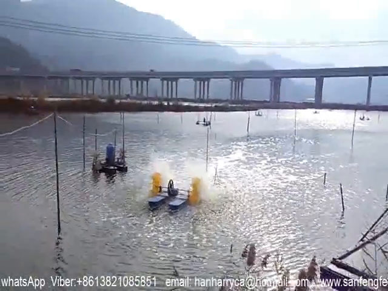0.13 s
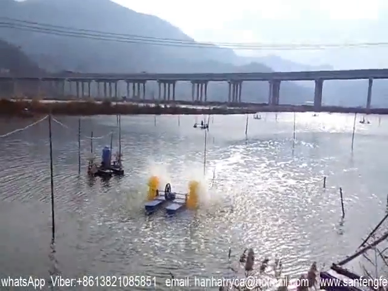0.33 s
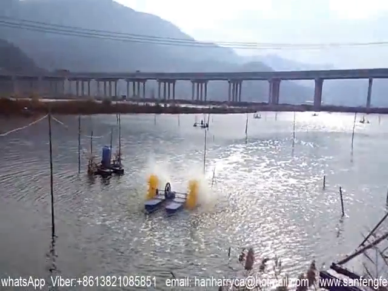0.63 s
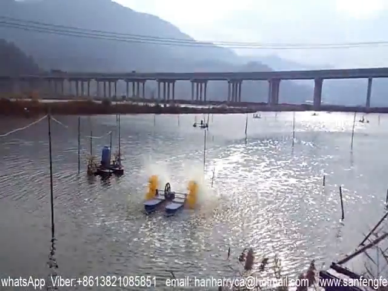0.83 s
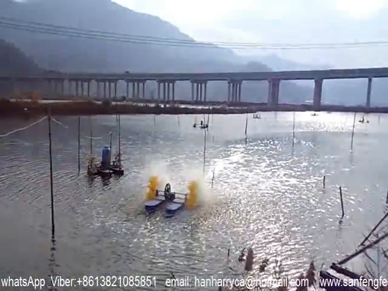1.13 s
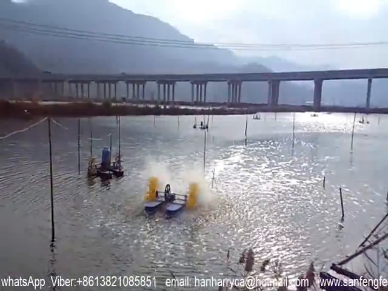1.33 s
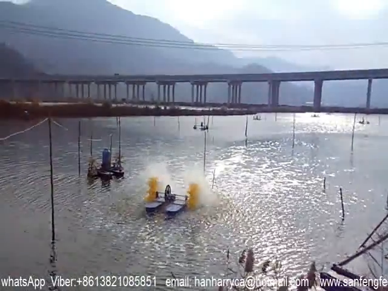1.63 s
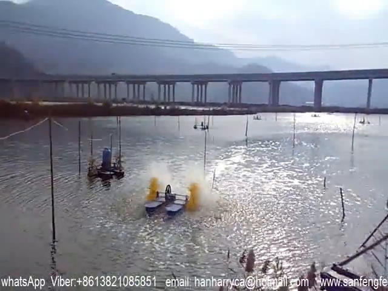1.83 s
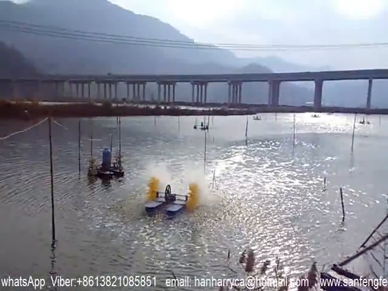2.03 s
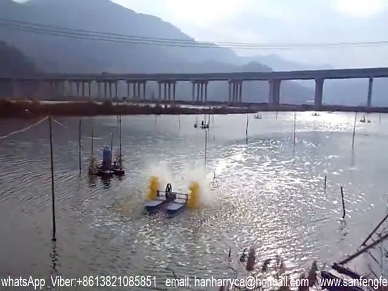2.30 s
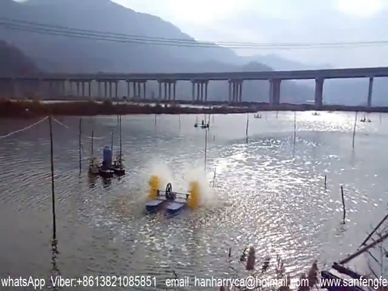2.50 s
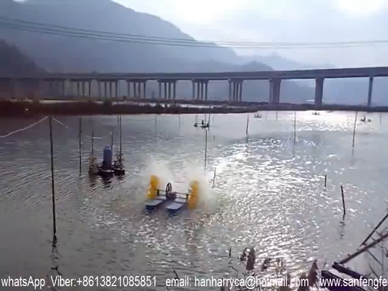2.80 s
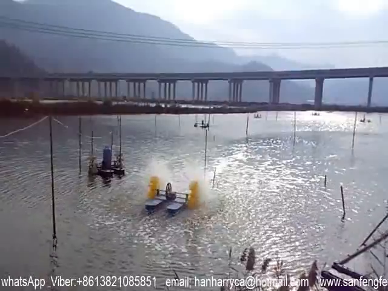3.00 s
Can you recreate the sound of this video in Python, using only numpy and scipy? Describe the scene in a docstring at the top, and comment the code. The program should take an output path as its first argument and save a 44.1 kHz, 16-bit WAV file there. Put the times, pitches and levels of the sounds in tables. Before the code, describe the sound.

A paddlewheel aerator churns a pond at some distance throughout: dense, bright spray and pattering drops over a low, slightly fluttering motor hum, pulsing faintly with the quick blades. Soft scrapes recur; short mid-pitched gear moans join from 0.6 s. Small water splats land at 1.1-1.9 s. Low wind bursts buffet the microphone, mostly right, strongest at 2.2-2.8 s; the machine dips, faintest near 2.95 s, then partly recovers.

```python
"""A paddlewheel aerator churns a pond some way off: throughout, motor harmonics hum, frame resonances
ring, and noise bands and ringing clicks make the wash and drops. Narrow noise chirps scrape and bass-noise
gusts buffet the microphone, mostly on the right, from the start. Sine moans of the gears join at 0.6 s,
in groups about once a turn; noise-burst splats land from 1.1 to 1.9 s. The strongest gusts come at
2.2-2.8 s; during them the aerator grows fainter, lowest at 2.95 s, then partly recovers."""
import sys
import numpy as np
from scipy import signal
from scipy.fft import rfft, irfft, next_fast_len
from scipy.io import wavfile

SR = 44100
rng = np.random.default_rng(int(sys.argv[2]) if len(sys.argv) > 2 else 0)


def store_wav(level_fs):
    """Save 16-bit WAV to argv[1]."""
    pcm = np.round(np.clip(np.atleast_2d(level_fs), -1, 1) * 32767)
    wavfile.write(sys.argv[1], SR, pcm.T.astype(np.int16))


N = 138915

# Machine level at the microphone, for wash, drops, frame ring and (by share) hum: t/s, level/dB
MACHINE_LEVEL = [(0, -1.5), (.3, -2.5), (.6, 0), (1.0, -0.9), (1.35, 1.33), (1.7, -1), (1.95, 1.05),
                 (2.25, -0.14), (2.5, -2.5), (2.75, -8), (2.95, -14), (3.15, -9)]
# Motor harmonics: multiple/1, level at 0 dB machine level/dB, flutter/1, blade throb depth/1,
# share of machine level/1
HUM_HARMONICS = [(1, -28, 0.27, 0.095, 0.25), (2, -30.5, 0.54, 0.085, 0.91), (3, -46, 0.86, 0.14, 1),
                 (4, -46, 0.28, .2, 1), (5, -45.5, 0.96, 0.13, 0.8), (6, -37, 0.31, 0.33, 1)]
# Gearbox and frame resonances: f/Hz, width/Hz, level before machine level and throb/dB
FRAME_MODES = [(66.8, 15, -35.5), (299.8, 29.4, -39.5), (338.4, 21.8, -37), (372.6, 36.5, -39),
               (500, 9.8, -50), (543.6, 41, -45), (631, 34, -41), (690.5, 46, -42), (773, 45.4, -40),
               (1134.5, 37, -52)]
# Gear moans under load: t/s, half length/s, level/dB, f/Hz
MOANS = [(0.632, 0.055, -27, 381.5), (0.777, .025, -34, 380), (1.248, 0.032, -28, 378),
         (1.368, 0.037, -28.5, 385.6), (1.544, 0.037, -34, 378.3), (1.861, 0.03, -26, 381.7),
         (1.967, 0.038, -27.5, 382), (2.49, 0.056, -29, 382)]
# Wheel scrapes, mostly twice a turn: t/s, level/dB, f/Hz
SCRAPES = [(.038, -41, 2050), (.149, -39.5, 2020), (0.663, -37.5, 2050), (.77, -42, 2000), (.86, -45, 2050),
           (1.283, -38.5, 2080), (1.393, -42, 2050), (1.49, -42, 2000), (1.91, -42, 2030),
           (2.01, -41, 2050), (2.15, -51, 2050), (2.533, -40.5, 2080), (2.64, -44, 2040)]
# Spray spectrum, relative: f/Hz, level per Hz/dB
WASH_SPECTRUM = [(150, 12), (300, 6.5), (450, 6), (800, 4), (1000, 4), (1300, 1), (1600, -5), (2000, 0),
                 (2500, -5), (4500, -6), (6500, -12), (9000, -13), (11000, -11), (12800, -8), (14300, -11)]
# Left-right likeness of the wash: f/Hz, likeness/1
WASH_LIKENESS = [(200, 1), (700, 0.83), (1200, 0.8), (1900, 0.82), (3000, 1), (4300, 0.98), (5800, 1),
                 (8000, 0.99), (13000, 0.76)]
# Louder splats of water: t/s, peak level/dB, f/Hz, width/Hz
SPLATS = [(1.124, -27, 2540, 900), (1.391, -30, 2500, 1400), (1.448, -26.5, 3000, 1010),
          (1.597, -25, 2390, 1400), (1.888, -29, 3430, 500)]
# Steady wind spectrum, relative: f/Hz, level per Hz/dB
RUMBLE_SPECTRUM = [(18, -5), (30, 2.5), (50, -3.5), (70, 1), (100, -8), (150, -17), (220, -15.5),
                   (400, -32)]
# Wind gusts: t/s, half length/s, level/dB, upper edge f/Hz
GUSTS = [(0.127, 0.025, -16, 51), (0.199, 0.017, -15.5, 99), (.26, .015, -20.5, 59.7),
         (0.506, 0.019, -18.5, 74.6), (0.586, 0.01, -14, 169), (0.622, 0.025, -16.5, 63.6),
         (0.695, 0.006, -15, 160), (.755, .022, -21, 70), (1.1, 0.052, -25.5, 100),
         (1.495, 0.028, -18.5, 128), (1.55, 0.047, -14, 48), (1.686, 0.023, -16.5, 109),
         (2.248, 0.011, -12, 85), (2.467, 0.009, -11, 189), (2.506, 0.011, -14, 202),
         (2.544, 0.023, -10.5, 85), (2.594, .008, -9.5, 145), (2.683, 0.058, -18.5, 110),
         (2.739, 0.017, -10, 180), (2.762, .01, -8.5, 150), (2.857, 0.033, -14.5, 70), (3.01, .05, -25, 79),
         (3.085, 0.04, -14, 45.3), (3.127, 0.012, -14, 200)]
# Left minus right, whole scene: f/Hz, level/dB
BALANCE = [(100, -9), (330, -10), (550, -7.5), (800, -5.5), (1200, -3), (1900, -1.2), (2800, 0),
           (4200, 0.3), (5800, -1), (8000, -0.5), (13000, -0.8)]

BLADES_PER_S, FIRST_BLADE_S = 9.63, 0.068
MOTOR_HZ, SPEED_WANDER_RATIO, FLUTTER_HZ = 128.33, 0.00402, 9.9
FRAME_THROB_DB = 0.5
SCRAPE_WIDTH_HZ, SCRAPE_HALF_S = 280, 0.011
WASH_DB, WASH_PATCHY_DB, WATER_THROB_DB = -33.5, 1.34, 0.2
DROPS_PER_S, DROPS_DB, DROP_SPREAD_DB = 1500, -43.5, 4.5
DROP_CYCLES_TO_MINUS_60_DB, DROP_TILT_DB_PER_OCTAVE = 27, 1.5
SPLAT_DECAY_S = 0.0065
RUMBLE_DB, RUMBLE_PATCHY_DB, WIND_LIKENESS = -25.5, 5, 0.63
OVERLOAD_AMPLITUDE, CUTOFF_HZ, FADE_S = 0.87, 14200, 0.003


def motor(level_db):
    """Harmonics of a wandering motor speed flutter at random and throb with the blades."""
    speed_hz = MOTOR_HZ * (1 + SPEED_WANDER_RATIO * drift(3))
    phase = 2 * np.pi * np.cumsum(speed_hz) / SR
    out = 0
    for multiple, db, flutter, throb, share in HUM_HARMONICS:
        carrier = np.exp(1j * (round(multiple) * phase + 2 * np.pi * rng.random()))
        unsteady = 1 + flutter * (drift(FLUTTER_HZ) + 1j * drift(FLUTTER_HZ))
        tone = (unsteady * carrier).real * (1 + throb * blade_beat())
        out = out + from_db(db + share * level_db) * rms_one(tone)
    return out


def gearbox(level_db):
    """Noise-driven frame modes swell with the blades; the gears moan as short sines."""
    ring = sum(from_db(db) * resonant_noise(hz, width_hz) for hz, width_hz, db in FRAME_MODES)
    out = from_db(level_db + FRAME_THROB_DB * blade_beat()) * ring
    for s, half_s, db, hz in MOANS:
        tone = np.sqrt(2) * np.sin(2 * np.pi * (hz * seconds() + rng.random()))
        out = out + from_db(db) * swell(s, half_s) * tone
    return out


def scrapes():
    """Wheel scrapes: short bursts of narrow-band noise."""
    return sum(from_db(db) * burst(resonant_noise(hz, SCRAPE_WIDTH_HZ), s, SCRAPE_HALF_S)
               for s, db, hz in SCRAPES)


def water():
    """Spray and drops pulse slightly with the blades."""
    wash = from_db(WASH_DB) * banded_noise(WASH_SPECTRUM, WASH_LIKENESS, WASH_PATCHY_DB, count=24)
    return (wash + drops()) * from_db(WATER_THROB_DB * blade_beat())


def drops(count=36):
    """Random clicks, dealt among decaying resonators, ring as falling drops."""
    sizes = from_db(DROP_SPREAD_DB * np.minimum(rng.exponential(1, N), 3)) * rng.choice([-1, 1], N)
    clicks = sizes * (rng.random(N) < DROPS_PER_S / SR)
    dealt = rng.integers(0, count, N)
    out = 0
    for k, hz in enumerate(np.geomspace(1000, 5200, count)):
        r = np.exp(-np.log(1000) * hz / (DROP_CYCLES_TO_MINUS_60_DB * SR))
        w = 2 * np.pi * hz / SR
        struck = clicks * (dealt == k) + 1e-18
        ringing = signal.lfilter([0, np.sin(w)], [1, -2 * r * np.cos(w), r * r], struck)
        out = out + from_db(DROP_TILT_DB_PER_OCTAVE * np.log2(hz)) * ringing
    return from_db(DROPS_DB) * rms_one(out)


def splats():
    """Larger lumps of water: abrupt noise bursts with exponential decay."""
    out = 0
    for s, db, hz, width_hz in SPLATS:
        age_s = seconds() - s
        decay = (age_s > 0) * np.exp(-np.abs(age_s) / SPLAT_DECAY_S)
        splash = decay * resonant_noise(hz, width_hz)
        out = out + from_db(db) * splash / np.abs(splash).max()
    return out


def wind():
    """Turbulence at the microphone: patchy bass noise plus short band-limited gusts."""
    rumble = banded_noise(RUMBLE_SPECTRUM, [(100, WIND_LIKENESS)], RUMBLE_PATCHY_DB, count=7)
    out = from_db(RUMBLE_DB) * rumble
    for s, half_s, db, edge_hz in GUSTS:
        low_pass = signal.butter(4, edge_hz, fs=SR, output="sos")
        high_pass = signal.butter(1, edge_hz / 6, "high", fs=SR, output="sos")
        eddies = signal.sosfilt(np.vstack([low_pass, high_pass]), rng.standard_normal((2, N)))
        mid, side = (burst(eddy, s, half_s) for eddy in eddies)
        out = out + from_db(db) * widen(mid, side, WIND_LIKENESS)
    return out


def blade_beat():
    """Cosine reaching 1 as each blade meets the water."""
    return np.cos(2 * np.pi * BLADES_PER_S * (seconds() - FIRST_BLADE_S))


def banded_noise(spectrum, likeness, patchy_db, count):
    """Stereo noise bands flicker partly together; total rms 1."""
    out, together = 0, drift(25)
    edges_hz = np.geomspace(spectrum[0][0], min(spectrum[-1][0], SR / 2 - 1), count + 1)
    white = rng.standard_normal((2, 2, N + SR // 2))
    for k, (low_hz, high_hz) in enumerate(zip(edges_hz, edges_hz[1:])):
        sos = signal.butter(3, [low_hz, high_hz], "band", fs=SR, output="sos")
        mid, side = signal.sosfilt(sos, white[k % 2])[:, -N:]  # neighbours use unrelated noise
        hz = np.sqrt(low_hz * high_hz)
        level_db = at_hz(spectrum, hz) + patchy_db * (0.32 * together + drift(46))
        out = out + from_db(level_db) * widen(mid, side, at_hz(likeness, hz))
    return rms_one(out)


def resonant_noise(hz, width_hz):
    """Noise through a band-pass, rms 1."""
    edges_hz = [max(hz - width_hz / 2, 10), hz + width_hz / 2]
    sos = signal.butter(2, edges_hz, "band", fs=SR, output="sos")
    return rms_one(signal.sosfilt(sos, rng.standard_normal(N + SR // 2))[-N:])


def burst(noise, s, half_s):
    """Bell-shaped piece of noise, about rms 1 at its crest."""
    shape = swell(s, half_s) + 1e-12
    return rms_one(noise * shape) * np.sqrt(np.mean(shape ** 2))


def swell(s, half_s):
    """Gaussian envelope around a moment."""
    return np.exp(-.5 * ((seconds() - s) / half_s) ** 2)


def drift(rate_hz):
    """Slow smoothed noise around 0, rms 1, made at SR / 40."""
    r = np.exp(-80 * np.pi * rate_hz / SR)
    slow = signal.lfilter([1], [1, -2 * r, r * r], rng.standard_normal(N // 40 + 2002))[2000:]
    return np.interp(np.arange(N) / 40, np.arange(len(slow)), rms_one(slow))


def widen(mid, side, alike):
    """Two unrelated signals to a stereo pair of given likeness."""
    alike = np.clip(alike, 0, 1)
    return np.sqrt((1 + alike) / 2) * mid + np.sqrt((1 - alike) / 2) * side * np.array([[1], [-1]])


def at_hz(points, hz):
    """Read a table on a log-frequency axis."""
    table_hz, values = np.array(points).T
    return np.interp(np.log(hz), np.log(table_hz), values)


def from_db(db):
    """Decibels to gain."""
    return 10 ** (np.asarray(db) / 20)


def rms_one(x):
    """Scale to rms 1."""
    return x / np.sqrt(np.mean(x ** 2) + 1e-20)


def seconds():
    """Time of every sample."""
    return np.arange(N) / SR


def scene():
    """Aerator on the pond, wind at the microphone."""
    level_db = np.interp(seconds(), *np.transpose(MACHINE_LEVEL))
    machine = motor(level_db) + gearbox(level_db) + scrapes()
    return machine + from_db(level_db) * water() + splats() + wind()


def record(dry):
    """Stereo balance weak in the left bass, soft overload, faded ends, treble cut."""
    size = next_fast_len(N + SR // 2)
    bins_hz = np.maximum(np.arange(size // 2 + 1) * SR / size, 1)
    left = from_db(at_hz(BALANCE, bins_hz))
    gains = np.array([left, np.ones_like(left)]) * 2 / (1 + left)  # mean gain 1
    heard = irfft(rfft(dry, size) * gains, size)[:, :N]
    heard = heard / (1 + (heard / OVERLOAD_AMPLITUDE) ** 6) ** (1 / 6)
    to_end_s = np.minimum(seconds(), seconds()[::-1])
    fade = np.sin(np.pi / 2 * np.minimum(to_end_s / FADE_S, 1)) ** 2
    treble_cut = signal.ellip(16, .2, 80, CUTOFF_HZ, fs=SR, output="sos")
    return signal.sosfilt(treble_cut, heard * fade)


dry = scene()
out = record(dry)
store_wav(out)
```